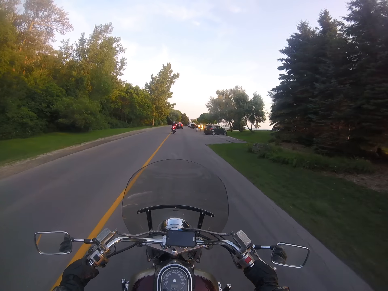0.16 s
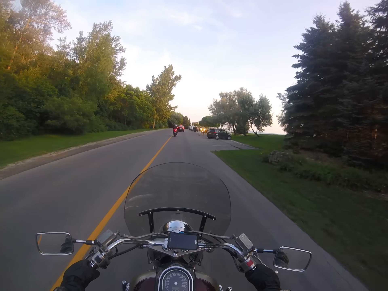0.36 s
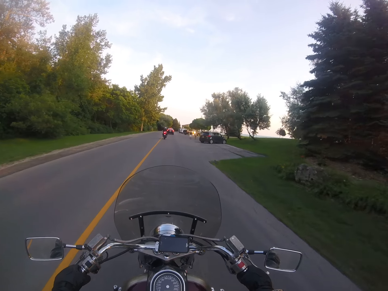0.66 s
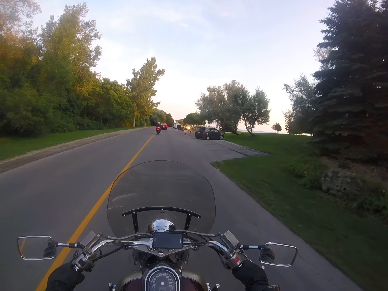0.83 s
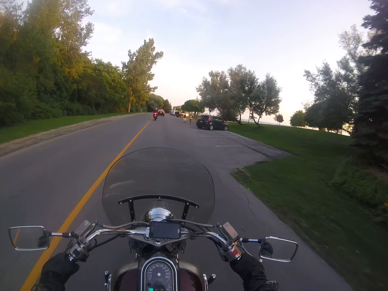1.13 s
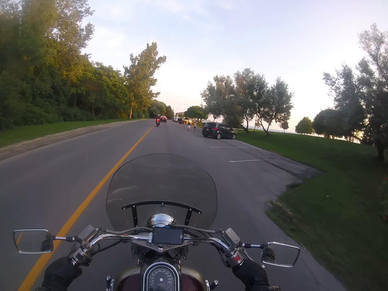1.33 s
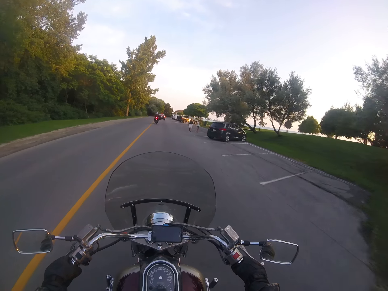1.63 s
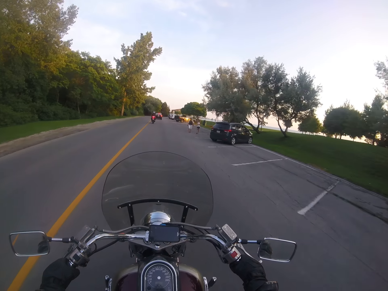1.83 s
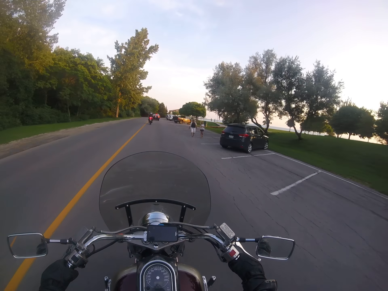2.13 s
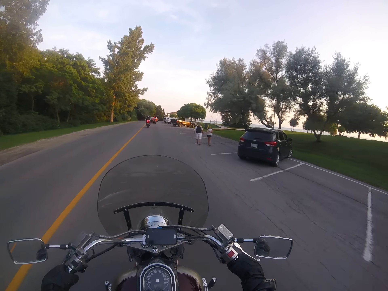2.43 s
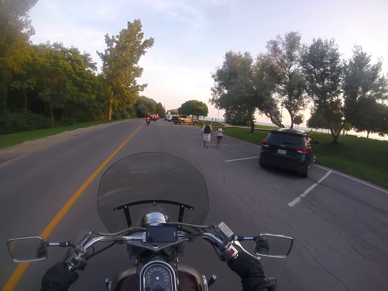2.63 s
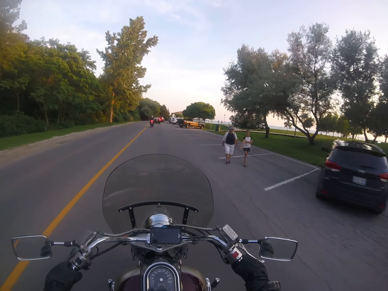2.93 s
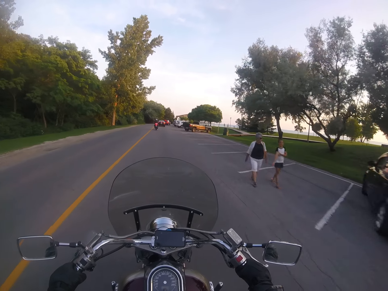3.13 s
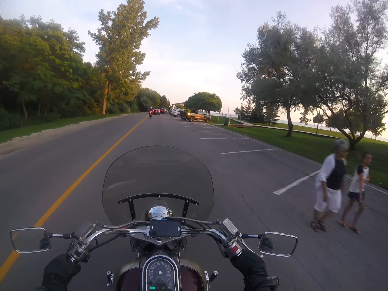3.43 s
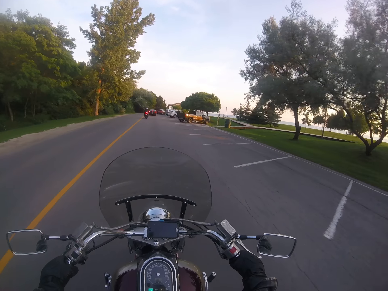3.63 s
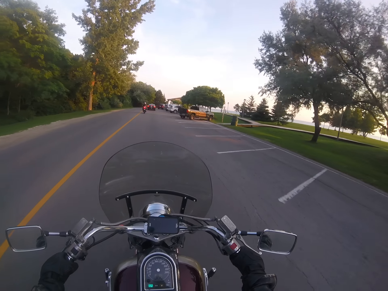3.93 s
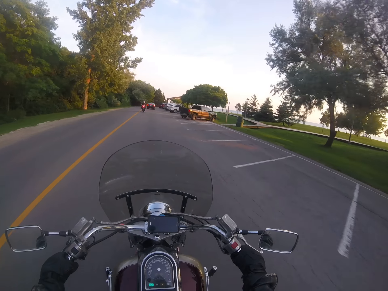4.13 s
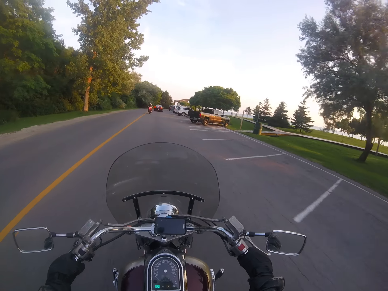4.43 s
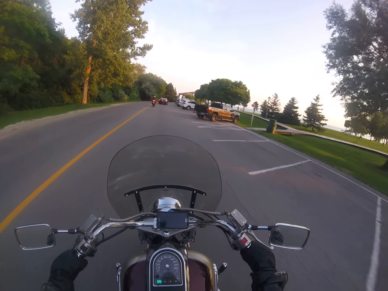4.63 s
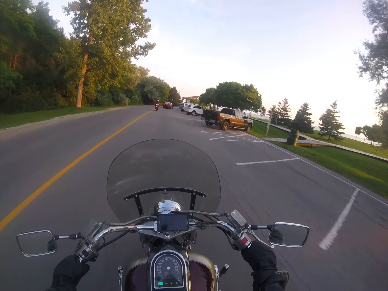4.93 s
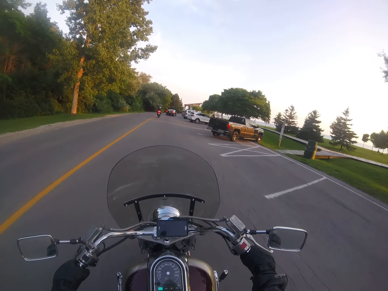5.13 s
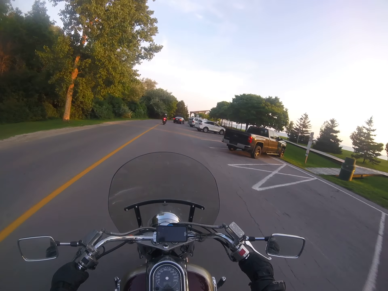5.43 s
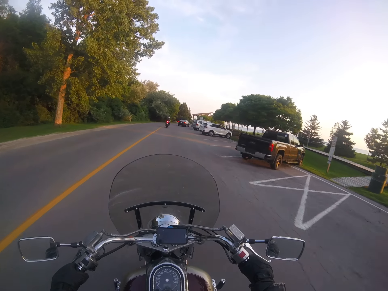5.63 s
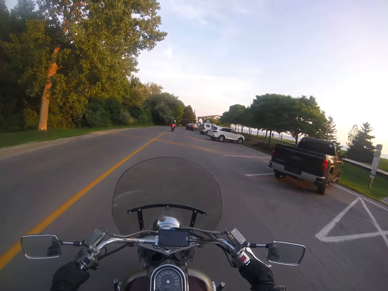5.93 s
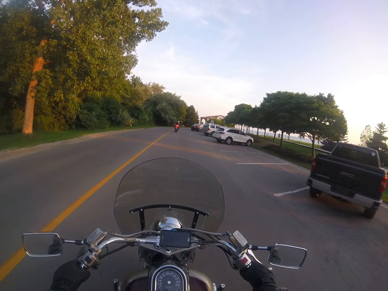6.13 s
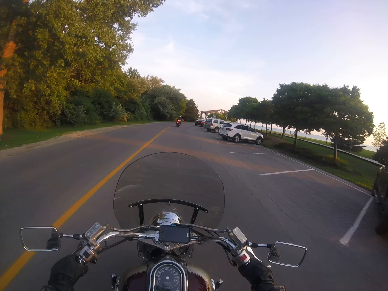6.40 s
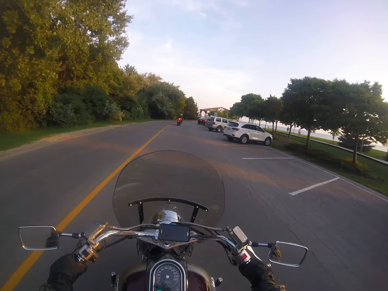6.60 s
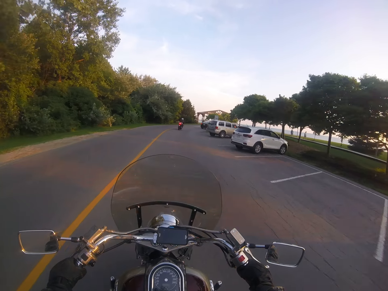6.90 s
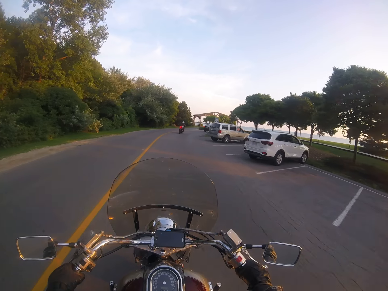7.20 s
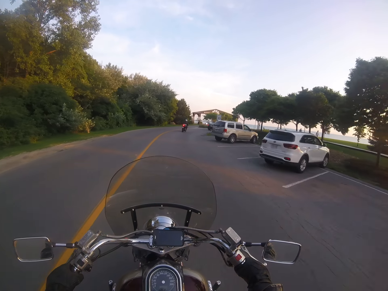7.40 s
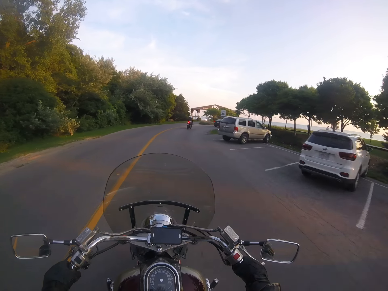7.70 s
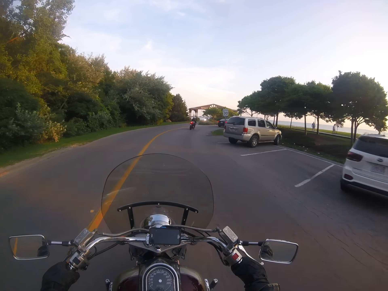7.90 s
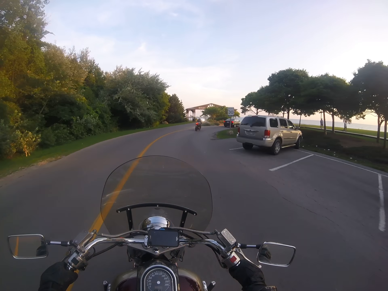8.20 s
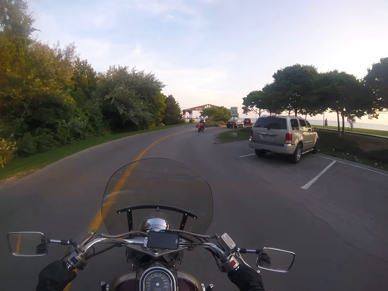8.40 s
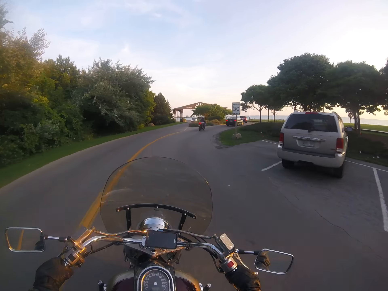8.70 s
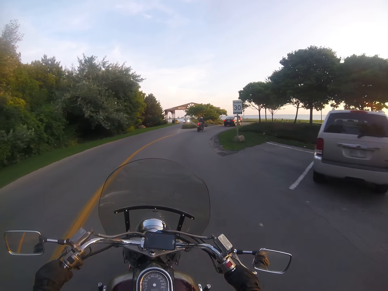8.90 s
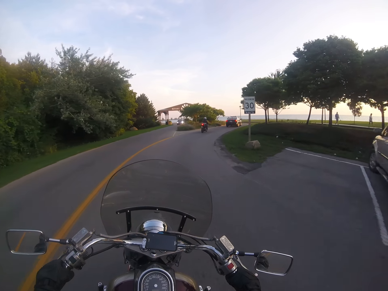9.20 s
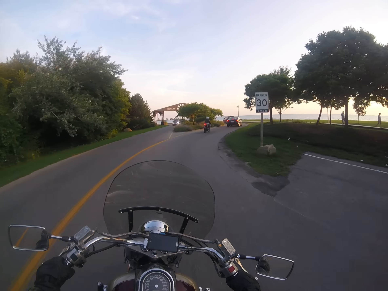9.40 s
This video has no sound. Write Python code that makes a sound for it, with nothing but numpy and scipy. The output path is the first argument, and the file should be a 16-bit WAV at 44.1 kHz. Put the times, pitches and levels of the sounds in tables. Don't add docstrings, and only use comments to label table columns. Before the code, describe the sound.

A big twin-cylinder motorcycle thumps and crackles unevenly at easy road speed, swelling for two seconds mid-ride, with muffled wind and a trembling low hum.

```python
import sys
import numpy as np
from scipy import signal
from scipy.fft import rfft, irfft
from scipy.io import wavfile
from scipy.ndimage import uniform_filter1d

SR = 44100
rng = np.random.default_rng(int(sys.argv[2]) if len(sys.argv) > 2 else 0)


def volts(x):
    e = np.asarray(x, float) / 20
    return 10 ** e


def transcribe(u):
    v = np.clip(np.atleast_2d(u).T, -1, 1)
    q = np.round(v * 32767).astype(np.int16)
    wavfile.write(sys.argv[1], SR, q)


N = 421155


def level(x, db):
    return x * volts(db) / np.sqrt(np.mean(x ** 2))


def curves(table):
    s, *columns = np.transpose(table)
    return [np.interp(np.arange(N) / SR, s, column) for column in columns]


def resonance(x, hz, width):
    return signal.lfilter(*signal.iirpeak(hz, hz / width, SR), x)


def ring(x, modes):
    total = 0
    for k, (hz, width, db) in enumerate(modes):
        total = total + (-1) ** k * volts(db) * resonance(x, hz, width)
    return total


def coloured(spectrum):
    hz, db = np.transpose(spectrum)
    bins = np.arange(1, N // 2 + 2) * SR / N
    weight = volts(np.interp(np.log(bins), np.log(hz), db))
    return level(irfft(rfft(rng.standard_normal(N)) * weight, N), 0)


def walk(rate):
    k = int(SR / rate)
    held = np.repeat(rng.standard_normal(N // k + 1), k)
    return 1.414 * uniform_filter1d(uniform_filter1d(held, k), k)[:N]


def beats(cycle, place, jitter_s, scatter_db):
    chance = rng.standard_normal((int(cycle[-1]) + 1, 2))
    at = np.interp(np.arange(len(chance)) + place, cycle, np.arange(N), left=N, right=N)
    at = at + jitter_s * SR * chance[:, 0]
    out = np.zeros(N + 1)
    np.add.at(out, np.clip(at, 0, N).astype(int), volts(scatter_db * chance[:, 1]))
    return out[:N]


def fade(x, decay_s):
    return signal.lfilter([1], [1, -np.exp(-1 / (decay_s * SR))], x)


# centre in Hz, width in Hz, level in dB.
HOUSING = [(280, 47.4, 1), (409, 59, -5.5), (479.4, 23.7, 0.5), (586, 33, -3.5), (643, 170, -10.5),
           (1030, 217, -14), (1170, 360, -14.5), (1509, 193, -4.5), (2078, 237, -14.5), (2404, 150, -12),
           (2839, 324, -11.5), (3927, 400, -18), (4228, 63, -15.5), (4780, 600, -23.5)]
# frequency in Hz, density in dB per Hz.
BUFFET = [(15, 2.5), (45, 10), (105, 2.5), (205, -.5), (235, -6), (350, -23), (800, -34)]
BUFFET_DB, BUFFET_PER_RUSH = -44.5, .55
RUSH_DB, RUSH_PER_THROTTLE = -52, 0.11


def rush(rush_db):
    swell = .8 * walk(8)
    band = 0
    for hz, width, db in HOUSING:
        flicker = rng.standard_normal(N) * volts(swell + 1.37 * walk(20))
        once = resonance(flicker, hz, 1.66 * width)
        band = band + volts(db) * resonance(once, hz, 1.66 * width)
    buffet_db = BUFFET_DB + BUFFET_PER_RUSH * (rush_db - RUSH_DB) + 1.4 * walk(8)
    return level(band, 0.87) * volts(rush_db) + volts(buffet_db) * coloured(BUFFET)


# frequency in Hz, density in dB per Hz.
HISS = [(3000, -20), (5000, -12), (5700, -10.5), (6150, -7.5), (6500, 2), (6900, -4.5), (8000, -7),
        (9400, -10), (10200, -15.5), (11800, -12.5), (13500, -16.5), (14500, -26)]


def hiss():
    return volts(-62) * coloured(HISS)


# time in seconds, peak in dB, hum in Hz, half length in seconds.
BUMPS = [(0.204, -30, 78.5, 0.026), (0.276, -22.7, 81.6, 0.029), (0.46, -25.5, 85.2, 0.068),
         (0.796, -33, 83.9, 0.018), (0.893, -26, 81.1, 0.026), (1.123, -27, 82.6, 0.021),
         (1.398, -32.5, 82.6, 0.083), (1.596, -26, 85.3, 0.044), (2.762, -22.5, 82.5, 0.035),
         (3.625, -26, 82.7, 0.027), (3.992, -30.5, 80, 0.022), (4.555, -32, 81.15, 0.028),
         (4.859, -31.5, 76.9, 0.02), (5.126, -30, 83, 0.061), (5.285, -32.5, 84.74, 0.059),
         (5.394, -31.5, 81.85, 0.044), (5.616, -26.5, 83.5, 0.043), (5.744, -24, 81.7, 0.052),
         (5.827, -28.5, 82, 0.023), (6.115, -35.4, 80.0, 0.098), (6.387, -25.5, 80.5, 0.033),
         (6.479, -28, 80.3, 0.026), (6.633, -31, 84.7, 0.035), (6.817, -30, 82.7, 0.021),
         (7.036, -27, 82.7, 0.048), (7.282, -26.5, 79.4, 0.049), (7.7, -28, 83.5, 0.058),
         (8.242, -27.5, 85.1, 0.065), (8.365, -29.5, 81, 0.029), (9.239, -30, 85.5, 0.045)]
MOUNT_HZ, MOUNT_WIDTH_HZ = 81.5, 9
TREMBLE_DB, TREMBLE_PER_ROAD = -39.5, .7


def mount(road_db):
    t = np.arange(N) / SR
    s, _, hz, _ = np.transpose(BUMPS)
    turns = np.cumsum(np.interp(t, s, hz) + 1.5 * walk(25)) / SR
    swell = sum(volts(db) * np.exp(-((t - at) / half_s) ** 2) for at, db, _, half_s in BUMPS)
    hum = np.sqrt(2) * swell * volts(1.5 + 0.67 * walk(15)) * np.sin(2 * np.pi * turns)
    grain = resonance(rng.standard_normal(N), MOUNT_HZ, MOUNT_WIDTH_HZ)
    grain = resonance(grain, MOUNT_HZ, 2 * MOUNT_WIDTH_HZ)
    tremble = level(grain, TREMBLE_DB) * volts(TREMBLE_PER_ROAD * road_db)
    return hum + tremble / (1 + swell / volts(-35))


PUFF_PLACES = [.985, .025, .25, .35, .565]
# dull part in dB, bright part in dB, decay in seconds, gain in dB per dB of throttle.
PUFFS = [
    (2, -2, 0.0046, 1),
    (1.5, -6, 0.0031, 1.5),
    (0, -21, 0.0053, 0.89),
    (3, 6, 0.0043, 1.5),
    (-3, 4.5, 0.013, 0.38),
]


def gas(cycle, throttle_db):
    low, high = 0, 0
    for place, (low_db, high_db, decay_s, gain) in zip(PUFF_PLACES, PUFFS):
        opening = fade(beats(cycle, place - .008, .0005, .8), .001) / (.001 * SR)
        puff = fade(opening, decay_s) * volts(gain * throttle_db)
        low = low + volts(low_db) * puff
        high = high + volts(high_db) * puff
    low = ring(low * rng.standard_normal(N), HOUSING[2:8])
    high = ring(high * rng.standard_normal(N), HOUSING[8:])
    return volts(-33.5) * (low + volts(-0.5) * high)


STRIKE_PLACES = [.025, .25, .345, .43, .525]
# wall ring in dB, silencer in dB, crack in dB, gain in dB per dB of throttle.
STRIKES = [
    (-11, -2.5, 0.5, 1.49),
    (-11.5, -8.5, 9, 1.26),
    (-3, -5.5, -3, 1.18),
    (-15.5, -11, -8, 1.48),
    (0, -13, -14, 0.68),
]
# centre in Hz, width in Hz, level in dB.
RING = [(422, 53, -6.5), (486.5, 17, 5), (537.6, 29, -3.5), (580.4, 8.6, -1.5)]
# centre in Hz, width in Hz, level in dB.
SILENCER = [(679, 30, -2.5), (949, 30, 3), (1034, 180, -7.5)]


def metal(cycle, throttle_db):
    walls, can, crack = 0, 0, 0
    for place, (ring_db, can_db, crack_db, gain) in zip(STRIKE_PLACES, STRIKES):
        blow = -beats(cycle, place, .0006, 1.2) * volts(gain * throttle_db)
        walls = walls + volts(ring_db) * blow
        can = can + volts(can_db) * blow
        crack = crack + volts(crack_db) * blow
    return volts(-1.5) * ring(walls, RING) + volts(-9) * ring(can, SILENCER) + volts(-21.5) * ring(crack, HOUSING[6:9])


# place in the cycle from 0 to 1, level in dB, extra gain in dB per dB of throttle.
FIRINGS = [
    (.968, 0, 0),
    (.321, -12, .5),
]
# centre in Hz, width in Hz, level in dB, polarity as a sign.
PIPE = [(50, 32, -5.6, -1), (68, 78, -4.2, 1), (91, 10, -4.9, -1), (174, 77, -4, -1), (208, 13, 0, 1),
        (275, 21, -1.5, 1)]
THUMP_DB, THUMP_PER_THROTTLE, THUMP_PER_ROAD = -43.3, .22, .3


def exhaust(cycle, throttle_db, road_db):
    fire = 0
    for place, db, gain in FIRINGS:
        fire = fire + beats(cycle, place, .0004, 1.5) * volts(db + gain * throttle_db)
    dip = -fade(fade(fire, .003), .003)
    thump = sum(sign * volts(db) * resonance(dip, hz, width) for hz, width, db, sign in PIPE)
    thump_db = THUMP_DB + THUMP_PER_THROTTLE * throttle_db + THUMP_PER_ROAD * road_db
    return level(thump, 4.5) * volts(thump_db)


# start in seconds, peak in dB, length in seconds.
KNOCKS = [(0.085, -44, 0.01), (0.182, -41, 0.025), (0.275, -44, 0.011), (0.39, -49, 0.015),
          (0.538, -46, 0.012), (0.617, -44, 0.008), (0.832, -43, 0.022), (0.987, -40, 0.0077),
          (1.323, -42.5, 0.022), (1.364, -48, 0.01), (1.5758, -43.5, 0.014), (3.58, -50, 0.012),
          (4.108, -44.5, 0.02), (6.102, -54, 0.0087), (6.67, -58, 0.013), (8.149, -47.5, 0.014),
          (9.367, -43, 0.014)]


def knocks():
    gate = np.zeros(N)
    for s, db, length_s in KNOCKS:
        start = int(s * SR)
        t = np.arange(N - start)[:4000] / SR / length_s
        gate[start:][:4000] += volts(db + 33.5) * t * np.exp(-2 * t)
    burst = gate * rng.standard_normal(N)
    return ring(burst, HOUSING[5:]) * volts(-1.0) + volts(-2.5) * resonance(burst, 396, 123)


def housing(outside):
    return signal.sosfilt(signal.butter(6, 5200, fs=SR, output="sos"), outside)


# time in seconds, four-stroke cycles per second.
CRANK = [(0.0, 15.043), (0.8, 14.428), (1.5, 14.223), (2.4, 13.626), (3.6, 12.964), (4.4, 13.102),
         (4.9, 13.413), (5.6, 14.163), (6.0, 14.205), (6.4, 13.989), (6.8, 13.967), (7.6, 13.552),
         (8.6, 13.15), (9.55, 12.854)]
CRANK_START = .113
# time in seconds, throttle in dB over cruising, road roughness in dB over smooth.
RIDE = [(0, 3.5, 5.5), (.6, 1.5, 4.5), (.9, 0, 2.5), (1.2, -1.5, 1), (1.5, 0.5, 2), (1.8, -5.5, 2.5),
        (3, 0, 0), (4.02, 1, 0), (4.25, 4, 4.5), (4.7, 8.5, 3.5), (5.3, 11, 5.5), (6.02, 8.5, 6),
        (6.24, -2, 4), (6.6, -1.5, 2.5), (7.8, -2.5, 1), (8.15, -1.5, 4), (8.5, -0.5, 1), (9.55, -1, 1.5)]


def scene():
    cycle = CRANK_START + np.cumsum(curves(CRANK)[0]) / SR
    throttle_db, road_db = curves(RIDE)
    lull_db = -(2.5 + .25 * throttle_db) * np.exp(-((cycle % 1 - .87) / .1) ** 2)
    air = rush(RUSH_DB + RUSH_PER_THROTTLE * throttle_db + road_db + lull_db)
    shaking = mount(road_db)
    engine = gas(cycle, throttle_db) + metal(cycle, throttle_db) + exhaust(cycle, throttle_db, road_db)
    return (housing(air + shaking + engine + knocks()) + hiss())[None]


# frequency in Hz, share of patches from 0 to 1.
DROPOUT = [(4900, 0), (5350, .2), (5800, 0), (9000, .02), (10300, .42), (11500, .25), (13500, .33),
           (14500, .6)]


def dropouts(x):
    hz, _, frames = signal.stft(x, SR, nperseg=1024)
    chance = uniform_filter1d(rng.standard_normal(frames.shape), 4, axis=1)
    chance = uniform_filter1d(chance, 5, axis=2)
    rank = .5 + .5 * np.tanh(.85 * chance / chance.std())
    share = np.interp(hz, *np.transpose(DROPOUT))[:, None]
    kept = np.where(rank < share, .03, 1)
    return signal.istft(frames * kept, SR, nperseg=1024)[1][:, :N]


def roll_off(x):
    return signal.sosfilt(signal.butter(12, 14560, fs=SR, output="sos"), x)


def record(dry):
    mix = dropouts(dry)
    return roll_off(mix)


dry = scene()
out = record(dry)
transcribe(out)
```